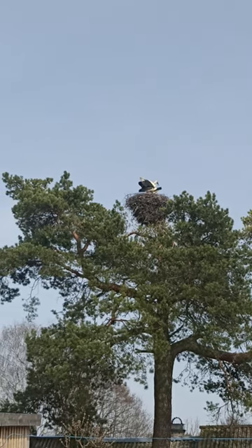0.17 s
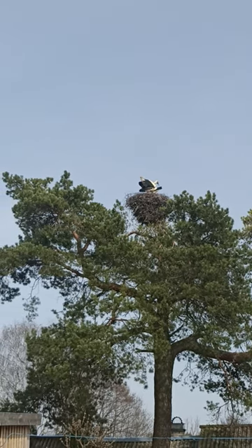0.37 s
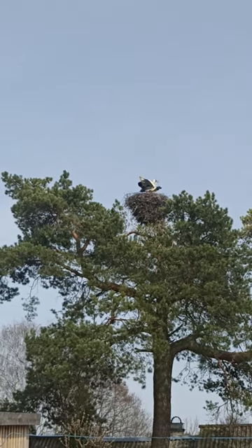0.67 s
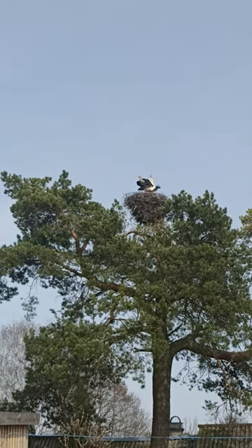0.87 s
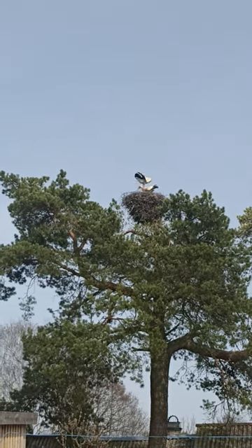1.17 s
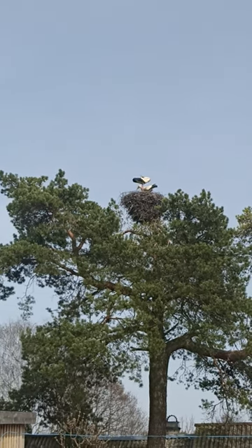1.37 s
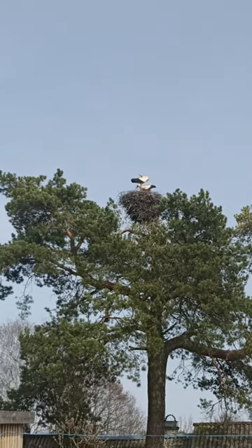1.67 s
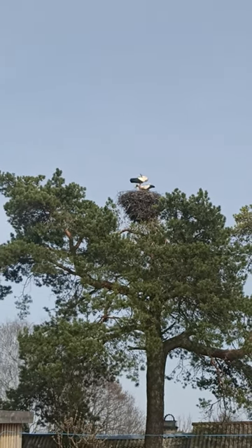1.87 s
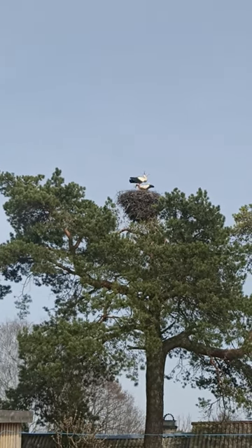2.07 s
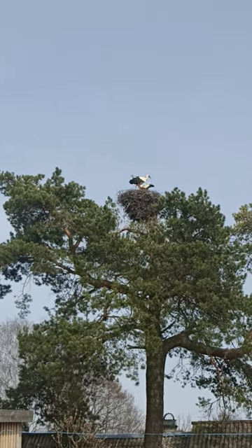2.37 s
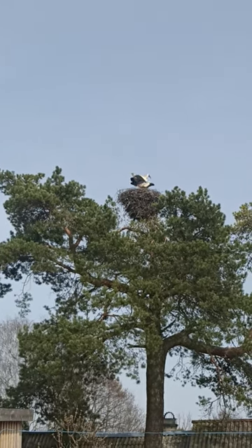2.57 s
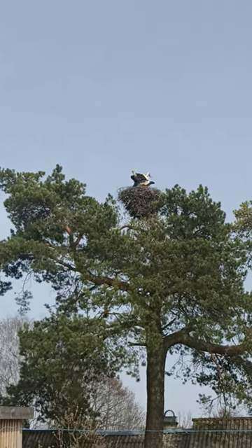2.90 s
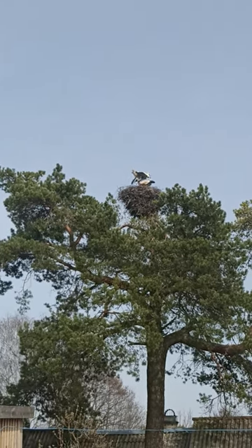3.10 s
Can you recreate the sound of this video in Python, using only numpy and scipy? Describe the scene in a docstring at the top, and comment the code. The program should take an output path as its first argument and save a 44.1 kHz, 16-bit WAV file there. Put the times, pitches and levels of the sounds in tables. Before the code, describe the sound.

Stork bill-clattering, two overlapping streams of quick woody clacks, with faint wind and distant traffic

```python
"""From the first moment two storks clatter their bills on a nest atop a pine, one faster than the other.
Each clap is three quick contacts that ring the hollow bill's modes; walls, twigs and trees echo it.
The faster bird holds its head down from 1.04 to 2.39 s; at 1.3 s a far songbird gives two faint gliding tones.
Light wind, band-filtered noise and short puffs, buffets two microphone ports, most strongly after 1.8 s.
A distant hum of traffic with microphone hiss, shaped noise, lies under it all; the claps stop just before the end."""
import sys
import numpy as np
from scipy import signal
from scipy.fft import rfft, irfft
from scipy.io import wavfile
from scipy.ndimage import uniform_filter1d

SR = 44100
rng = np.random.default_rng(int(sys.argv[2]) if len(sys.argv) > 2 else 0)


def how_loud(loudness_db):
    """Turn decibels into a plain amplitude multiplier (0 dB gives 1, 20 dB gives 10)."""
    steps = np.asarray(loudness_db, float) / 20
    return 10 ** steps


def master(y):
    """Save y as 16-bit WAV."""
    cut = np.clip(np.atleast_2d(y).T, -1, 1)
    pcm = np.round(cut * 32767)  # scale
    wavfile.write(sys.argv[1], SR, pcm.astype(np.int16))


N = 142884  # length [samples]


def columns(table):
    """Columns of a table."""
    return np.array(table, float).T


def unit(x):
    """Scale to rms 1."""
    return x / np.sqrt(np.mean(x ** 2))


def along(table, hz):
    """Read (frequency, value) points on a log-frequency axis."""
    f, value = columns(table)
    return np.interp(np.log(hz + 1), np.log(f + 1), value)


def shape(x, gain):
    """Filter by a gain given as a function of frequency."""
    return irfft(rfft(x) * gain(np.arange(N // 2 + 1) * SR / N), N)


def walk(rate):
    """Random levels held 1 / rate s and slewed twice."""
    hold = int(SR / rate)
    steps = np.repeat(rng.standard_normal(N // hold + 1), hold)
    return 1.27 * uniform_filter1d(uniform_filter1d(steps, hold), hold)[:N]


def wrap(x, response):
    """Circular convolution: the tail past the end fills the start, as if the clatter was already going on."""
    return irfft(rfft(x) * rfft(response), N)


def scatter(x, fade):
    """Smear a sound through fading noise of unit energy, as many small reflectors do."""
    return wrap(x, rng.standard_normal(N) * fade / np.sqrt((fade ** 2).sum()))


def decay(t, t60):
    """Exponential fade that loses 60 dB in t60."""
    return np.exp(-np.log(1000) * t / t60)


def clatter(claps, pose_at, bird_db, longest_t60_ms):
    """Each contact of a clap rings the bill's modes, each clap a little differently, under a dry crack of horn."""
    detune, scatter_db, scatter_ms = .014, 2.4, .035  # spread between claps; detune is a fraction of pitch
    treble_hz, treble_t60_ms = 4000, 4
    crack_db, crack_t60_ms, crack_band_hz = -8.5, 19, [1510, 3330]
    size = 2048
    t = np.arange(size) / SR
    out = np.zeros(N + size)
    chance = rng.standard_normal((len(claps), 32))
    crack_fade = decay(t * 1000, crack_t60_ms) * (t > .0007)
    cracks = rng.standard_normal((len(claps), size)) * crack_fade
    cracks = signal.sosfilt(signal.butter(2, crack_band_hz, "band", fs=SR, output="sos"), cracks)
    for (start, clap_db, tick_db), c, crack in zip(claps, chance, cracks):
        bill, contacts = pose_at(start)
        hz, mode_db, t60_ms = bill[:, :, None]
        modes = len(hz)
        treble = hz > treble_hz
        t60_ms = np.minimum(t60_ms, np.where(treble, treble_t60_ms, longest_t60_ms))
        pitch = hz * (1 + detune * c[:modes, None])
        gain = how_loud(mode_db + scatter_db * c[12:12 + modes, None] + tick_db * treble)
        clap = 0
        for k, (delay_ms, contact_db, low_db, top_db) in enumerate(contacts):
            since = np.maximum(t - abs(delay_ms + scatter_ms * c[24 + k]) / 1000, 0)
            tilt_db = low_db * (hz == hz.min()) + top_db * treble
            ring = np.sin(2 * np.pi * pitch * since) * decay(since, t60_ms / 1000)
            ring = gain * how_loud(tilt_db) * ring
            clap = clap + how_loud(contact_db + scatter_db * c[28 + k]) * ring.sum(0)
        clap = clap + how_loud(crack_db) * crack * np.sqrt((clap ** 2).sum() / (crack ** 2).sum())
        i = int(start * SR)
        # every clap gets the same energy before its own level
        out[i:i + size] += how_loud(clap_db + bird_db) * clap / np.sqrt((clap ** 2).sum() / 100)
    return signal.sosfilt(signal.butter(2, 552, "high", fs=SR, output="sos"), out[:N])


# the slower bird's claps: (start [s], relative level [dB], extra level of the treble modes [dB])
SLOW_CLAPS = [(0.074, -25.5, 9), (0.222, -27, 2), (0.366, -27.5, -13), (0.51, -28, -20), (0.654, -29, 7),
              (0.796, -29.5, 0), (0.943, -27.5, -5), (1.088, -27.5, -12), (1.233, -25, -7),
              (1.377, -25.5, 15), (1.519, -24.5, 17.5), (1.663, -24.5, 10), (1.805, -24, -14),
              (1.947, -25, 10), (2.091, -25, 8), (2.236, -26, 3), (2.382, -26, 14), (2.529, -28.5, 8),
              (2.676, -31.5, 7), (2.824, -28, -14), (2.972, -30, -6), (3.118, -29, -6)]
# its hollow bill's modes: (frequency [Hz], relative level [dB], t60 before the caps in clatter [ms])
SLOW_BILL = [(780, 6, 20), (1980, -43, 21), (2138, 9.5, 11), (2425, 4, 15.3), (3275, 1.5, 21),
             (4770, -19, 12), (5820, -20, 18), (9640, -29.5, 4.2), (12300, -33, 1.3)]
# contacts in a clap: (delay [ms], level [dB], extra on the lowest mode [dB], extra on the treble modes [dB])
SLOW_CONTACTS = [(.9, -6, 3, 7), (1.83, 0, -3, -6), (4.1, -10, -6, -8)]


def slow_stork():
    """The slower bird's bill rings with one set of modes and contacts throughout."""
    pose = columns(SLOW_BILL), SLOW_CONTACTS
    return clatter(SLOW_CLAPS, lambda s: pose, bird_db=-6, longest_t60_ms=17)


# the faster bird's claps: (start [s], relative level [dB], extra level of the treble modes [dB])
FAST_CLAPS = [(0.014, -23.5, 5), (0.12, -23.5, -7), (0.225, -25, -8), (0.328, -24, -2), (0.433, -24.5, -13),
              (0.537, -25, 13.5), (0.641, -25, 2), (0.741, -25, 5), (0.835, -26.5, 7), (0.921, -28, 14.5),
              (1.001, -27.5, 11), (1.079, -28.5, -18), (1.158, -25.5, -11), (1.237, -26, -5),
              (1.313, -25.5, -16), (1.392, -29.5, -2), (1.472, -26.5, 3), (1.551, -25, -7),
              (1.632, -24.5, 4), (1.715, -23.5, -2), (1.798, -25.5, -35), (1.88, -23.5, 1),
              (1.967, -23.5, -1), (2.056, -24.5, -3), (2.147, -24.5, -17), (2.241, -24.5, -13),
              (2.342, -23.5, -9), (2.443, -25, 4), (2.546, -24, -11), (2.649, -25.5, 5), (2.753, -26, 9.5),
              (2.857, -26, 8), (2.961, -27, 3), (3.061, -28, 9), (3.163, -27.5, 8)]
# its bill's modes: (frequency [Hz], relative level with head back [dB], relative level with head down [dB],
# t60 before the caps in clatter [ms])
FAST_BILL = [(812, 8.5, 3.5, 8.5), (1695, -53, 5, 10.2), (2108, 8, -7, 9.1), (2546, 2, 7.5, 12),
             (3085, -5.5, -18, 17), (3150, -20, -4.5, 14), (3460, -2, -38, 14), (4720, -14, -22, 3.1),
             (5840, -29, -12, 15), (9900, -12.5, -15, 2.5), (11630, -15, -26, 1.9)]
# contacts in a clap, head back, then head down:
# (delay [ms], level [dB], extra on the lowest mode [dB], extra on the treble modes [dB])
FAST_CONTACTS_BACK = [(.7, 0, 0, 1), (2.13, -1, -2, -10), (3.5, -9, -4, -9)]
FAST_CONTACTS_DOWN = [(0, -9, 6, 3), (1.4, 0, 0, 0), (3.26, -2, -12, -12)]


def fast_stork():
    """The faster bird's head position sets how strongly each bill mode rings and how the contacts fall."""
    back = columns(FAST_BILL)[[0, 1, 3]], FAST_CONTACTS_BACK
    down = columns(FAST_BILL)[[0, 2, 3]], FAST_CONTACTS_DOWN
    return clatter(FAST_CLAPS, lambda s: down if 1.04 < s < 2.39 else back, bird_db=-7.5, longest_t60_ms=12)


def path(x):
    """On the way down a broad dip is cut between low knock and upper ring; the lower treble is shaded."""
    dip_hz, dip_width_hz, dip_depth = 1243, 403, 0.69
    shade_from_hz, shade_to_hz, shade_db = 3380, 5050, -3.5

    def gain(hz):
        off_centre = 1j * (hz ** 2 - dip_hz ** 2) / ((hz + 1e-9) * dip_width_hz)
        dip = 1 - dip_depth / (1 + off_centre)
        shade = shade_db / (1 + (shade_from_hz / (hz + 1)) ** 20) / (1 + (hz / shade_to_hz) ** 20)
        return dip * how_loud(shade)

    return shape(x, gain)


# left port over right port for distant sources: (frequency [Hz], level difference [dB])
PORT_BALANCE = [(300, 2.5), (750, -2), (1200, 0.5), (1800, -9.5), (2100, -6.5), (2500, -3), (2900, 1),
                (3550, -3.5), (7000, 0), (9500, 0.5), (11500, 10.5), (14000, 9), (16000, -27)]


def ports(x):
    """The two ports hear a distant source with their own balance, the left a little earlier."""
    lead_s = 45e-6

    def half(hz):  # half the difference, applied forwards left and inverted right
        return how_loud(along(PORT_BALANCE, hz) / 2) * np.exp(1j * np.pi * hz * lead_s)

    return np.array([shape(x, half), shape(x, lambda hz: 1 / half(hz))])


def twigs(x):
    """Twigs and needles near the nest scatter the treble briefly, unlike at each port."""
    fade = decay(np.arange(N) / SR * 1000, 25)  # t60 25 ms
    each = [ports(scatter(x, fade))[port] for port in range(2)]
    return how_loud(-6) * signal.sosfilt(signal.butter(2, 3270, "high", fs=SR, output="sos"), each)


# echoes off walls: (delay [ms], smear [ms], level for the slower bird [dB], level for the faster bird [dB])
WALL_ECHOES = [(9, 2, -25, -22), (12.5, 2.5, -28, -22), (24.5, 2.5, -28, -18), (29, 2, -22, -22),
               (45, 6, -24, -22), (59, 5, -25, -23), (33.7, .4, -15, -17)]


def walls(slow, fast):
    """Each wall returns a clean copy plus a noise-smeared one; a far wall answers the slower bird alone."""
    clean = .6  # share of echo energy
    t, out = np.arange(N) / SR, 0
    for delay_ms, smear_ms, slow_db, fast_db in WALL_ECHOES:
        burst = rng.standard_normal(N) * np.exp(-((t * 1000 - delay_ms) / smear_ms) ** 2)
        burst *= np.sqrt((1 - clean) / (burst ** 2).sum())
        burst[int(delay_ms * SR / 1000)] += np.sqrt(clean)
        out = out + wrap(how_loud(slow_db) * slow + how_loud(fast_db) * fast, burst)
    # only the slower bird faces the far wall, less and less as it turns: -2.5 dB per second
    far = np.roll(slow * how_loud(-12 - 2.5 * t), int(88.5 * SR / 1000))
    return out + shape(far, lambda hz: 1 / np.sqrt(1 + (1500 / (hz + 1)) ** 8))


def trees(x):
    """The trees scatter the clatter into a long grainy tail, only partly alike at the two ports."""
    t60_s, rise_ms, grain_db, alike = 0.82, 3.5, 2.5, 0.19
    t = np.arange(N) / SR
    fade = decay(t, t60_s) * (1 - np.exp(-t * 1000 / rise_ms)) * how_loud(grain_db * walk(248.3))
    both, left, right = (scatter(x, fade) for _ in range(3))
    apart = np.array([ports(left)[0], ports(right)[1]])
    return how_loud(-9.5) * (np.sqrt(alike) * ports(both) + np.sqrt(1 - alike) * apart)


def yard(slow, fast):
    """Wall echoes and the tree tail, both losing treble above 4420 Hz."""
    echoes = ports(walls(slow, fast)) + trees(slow + fast)
    return shape(echoes, lambda hz: 1 / np.sqrt(1 + (hz / 4420) ** 2))


# a faint far songbird before its flutter: (time [s], pitch [Hz], level [dB])
CHIRP = [(1.325, 4550, -85), (1.345, 4300, -74), (1.363, 4120, -68), (1.375, 4050, -76), (1.42, 4250, -78),
         (1.447, 4020, -71), (1.465, 3950, -86)]


def songbird():
    """Two faint, broken falling notes: a gliding sine whose pitch and level flutter."""
    t = np.arange(N) / SR
    s, hz, db = columns(CHIRP)
    pitch = np.interp(t, s, hz) * (1 + .008 * walk(120))
    tone = np.sin(2 * np.pi * np.cumsum(pitch) / SR)
    level = how_loud(np.interp(t, s, db) + 4 * walk(90.8))  # 4 dB of flutter
    return ports(tone * level * (t > s[0]) * (t < s[-1]))


# wind on the ports: (time [s], relative level [dB], left over right [dB])
WIND = [(0, -70, 2.5), (.4, -65.5, 0), (.5, -60, 29), (.6, -67.5, -6), (.9, -64, 6), (.96, -66, -6),
        (1.07, -63.5, 7), (1.2, -66.5, -2.5), (1.65, -71, -5), (1.74, -60.5, -4), (1.92, -66.5, 5),
        (2.0, -60.5, 7), (2.1, -63, -9), (2.36, -59, -14), (2.45, -58, -10), (2.56, -49, -13),
        (2.68, -52.5, -10), (2.74, -62, -3), (2.8, -55, -5), (2.85, -65, 0), (2.96, -69.5, -10),
        (3.09, -55.5, -3), (3.18, -61, 2), (3.24, -61, -16)]
# single puffs: (time [s], peak level before the low cut [dB], port: 0 left, 1 right)
PUFFS = [(0.962, -48, 1), (1.067, -45, 0), (1.845, -25.5, 0), (2, -41.5, 0), (2.492, -33, 1),
         (2.519, -35, 1), (2.605, -30, 1)]


def wind():
    """Unrelated flickering rumble on each port, and single puffs that the low cut turns into one swing."""
    centre_hz, width_hz, flicker_db, puff_ms = 82.2, 70.6, 2.5, 3.27  # puff width between 1/e points
    t = np.arange(N) / SR
    s, db, pan_db = columns(WIND)

    def band(hz):
        return 1 / (1 + 1j * (hz ** 2 - centre_hz ** 2) / ((hz + 1e-9) * width_hz))

    out = []
    for port, sign in enumerate((1, -1)):
        share = 1 / (1 + how_loud(-2 * sign * np.interp(t, s, pan_db)))  # of the power
        gust = 2 * np.sqrt(share) * how_loud(np.interp(t, s, db))
        noise = rng.standard_normal(N) * how_loud(flicker_db * walk(25.2))
        rumble = unit(shape(noise, lambda hz: band(hz) ** 2)) * gust
        for at, puff_db, puff_port in PUFFS:
            puff = shape(np.exp(-((t - at) * 1000 / puff_ms * 2) ** 2), band)
            rumble = rumble + (puff_port == port) * how_loud(puff_db) * puff / puff.max()
        out.append(rumble)
    return np.array(out)


# far traffic and microphone hiss: (frequency [Hz], relative density [dB per Hz])
FLOOR = [(40, -27), (100, -16), (250, -11), (500, -10.5), (1200, -16), (3000, -24), (6000, -35.5),
         (9000, -41.5), (12300, -38.5), (16000, -37)]


def floor():
    """Steady noise of far traffic and hiss: alike in the low mids, unrelated in the treble."""
    mid, side = (shape(rng.standard_normal(N), lambda hz: how_loud(along(FLOOR, hz))) for _ in range(2))
    side = shape(side, lambda hz: hz / np.hypot(hz, 560))

    def lean(sign):  # a part of the port balance
        return lambda hz: how_loud(sign * 0.38 * along(PORT_BALANCE, hz) / 2)

    return how_loud(-60) * unit(np.array([shape(mid + side, lean(1)), shape(mid - side, lean(-1))]))


def scene():
    """Both birds, their echoes, the songbird, the wind and the background."""
    slow, fast = path(slow_stork()), path(fast_stork())
    birds = slow + fast
    return ports(birds) + twigs(birds) + yard(slow, fast) + songbird() + wind() + floor()


def low_pass(x):
    """Removes everything above the highest recorded frequency."""
    return signal.sosfilt(signal.butter(12, 16620, fs=SR, output="sos"), x)


def record(dry):
    """The phone cuts the lows below 62 Hz and, steeply, the top above 15150 Hz."""
    def cuts(hz):
        return 1 / np.sqrt((1 + (62 / (hz + 1)) ** 8) * (1 + (hz / 15150) ** 120))

    mix = shape(dry, cuts)
    return low_pass(mix)


dry = scene()
out = record(dry)
master(out)
```